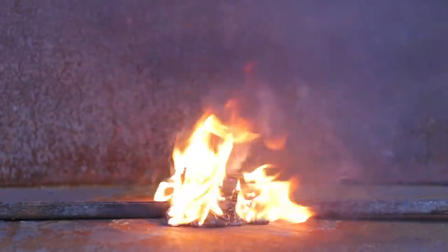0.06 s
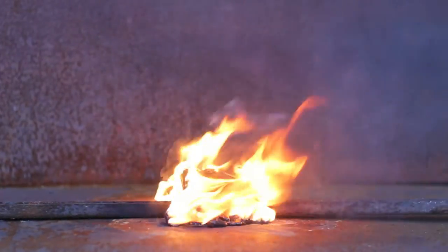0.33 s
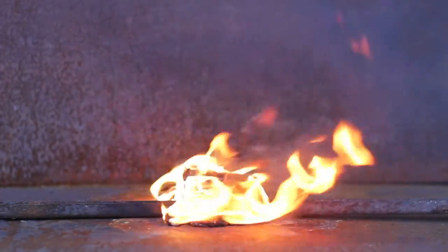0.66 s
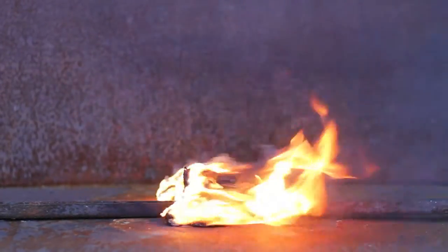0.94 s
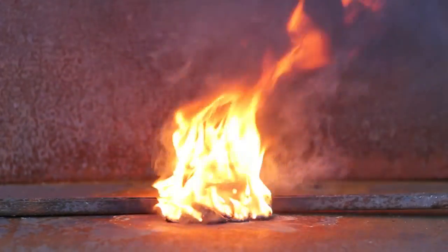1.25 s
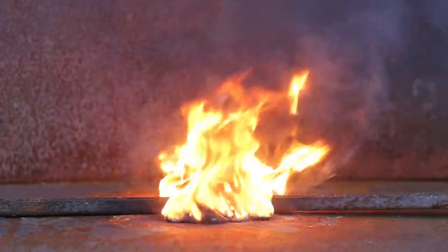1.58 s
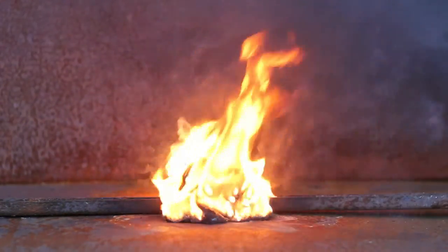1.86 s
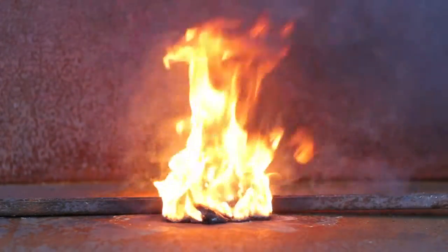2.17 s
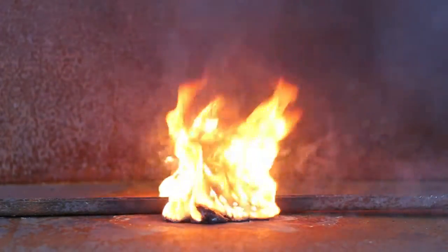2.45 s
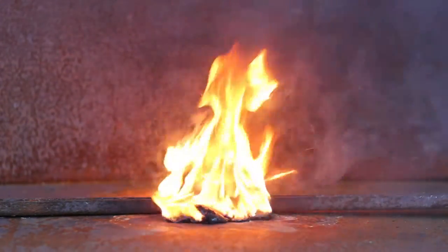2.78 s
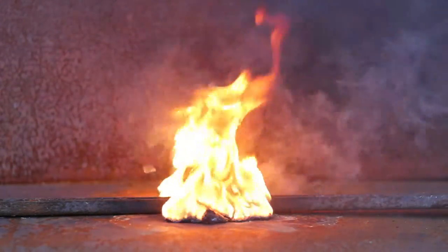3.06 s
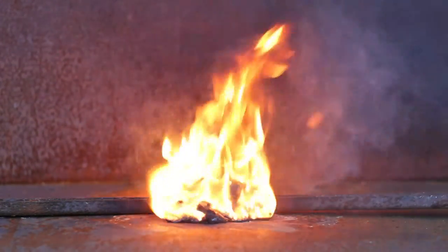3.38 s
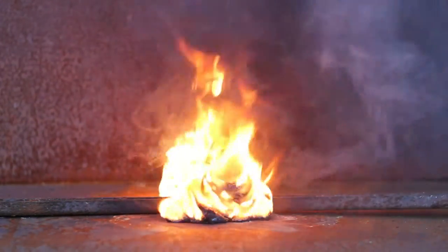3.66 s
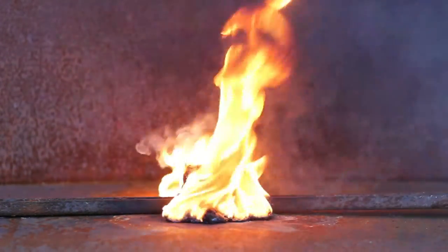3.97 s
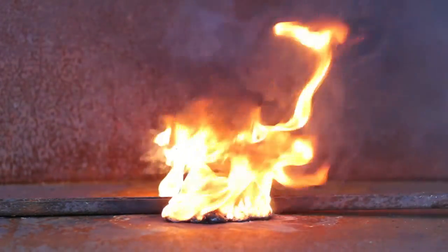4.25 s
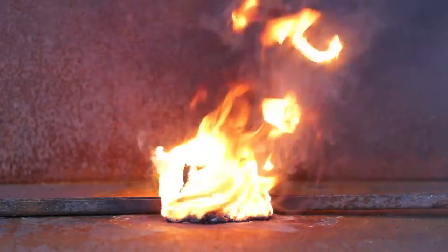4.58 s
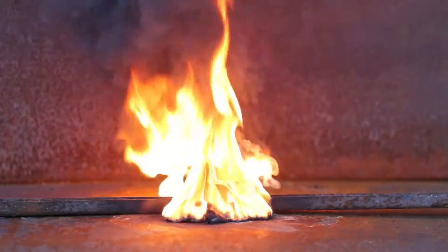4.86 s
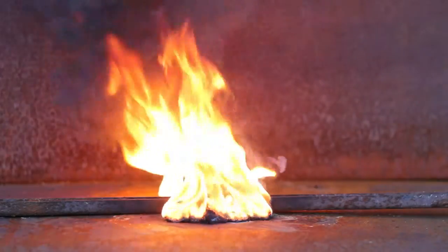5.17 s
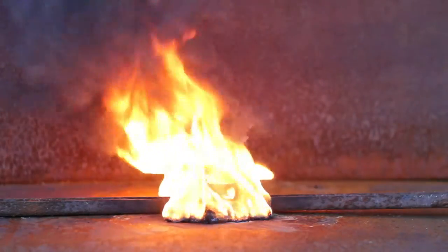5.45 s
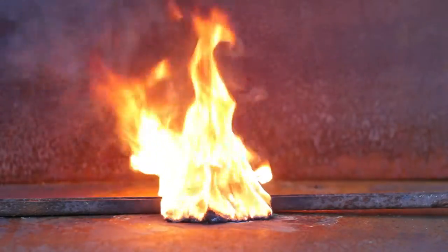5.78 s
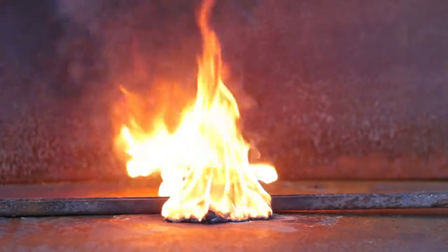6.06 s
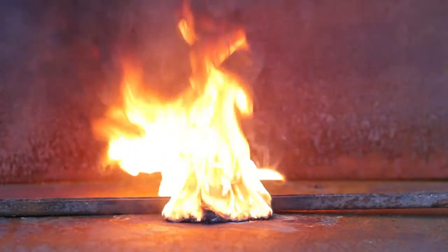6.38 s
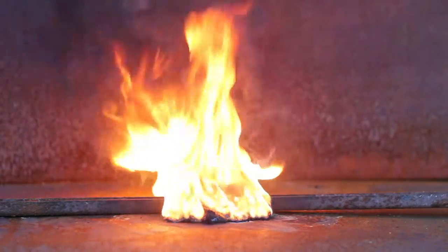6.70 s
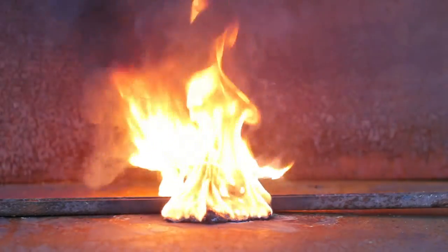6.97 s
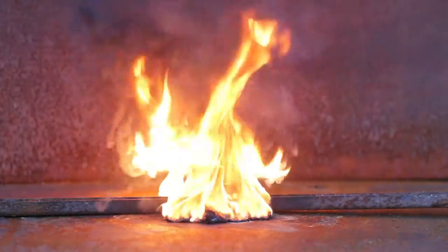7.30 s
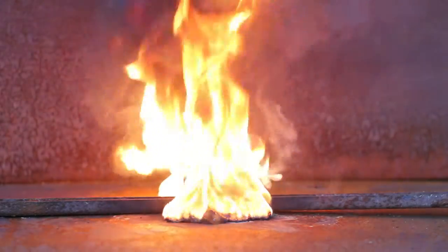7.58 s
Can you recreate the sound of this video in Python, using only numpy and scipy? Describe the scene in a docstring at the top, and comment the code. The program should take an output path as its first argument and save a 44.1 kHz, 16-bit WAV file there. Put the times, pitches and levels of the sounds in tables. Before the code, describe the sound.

Outdoors, flames flutter in a gust, then a lump of burning plastic snaps and crackles over a soft sizzle.

```python
"""Outdoors, in front of a wall, a lump of plastic burns on a steel plate.
Gas blisters burst in the melt as sharp pops and fine crackle over a soft hiss; the pops throw off specks,
and plate and wall reflect each pop. The turbulent flames give a low roar: a gust flattens them at first
and makes them flap, and they flare again at the end. Something hums faintly far away."""
import sys
import numpy as np
from scipy import signal
from scipy.fft import rfft, irfft
from scipy.io import wavfile
from scipy.ndimage import uniform_filter1d

SR = 44100
rng = np.random.default_rng(int(sys.argv[2]) if len(sys.argv) > 2 else 0)


def wav_record(signal):
    """Record a signal, one row per channel, as 16-bit PCM in the file named by sys.argv[1]."""
    frames = np.transpose(np.atleast_2d(signal))
    bounded = np.clip(frames, -1, 1)
    # unit amplitude maps onto the largest positive 16-bit level
    quanta = np.round(bounded * 32767).astype(np.int16)
    wavfile.write(sys.argv[1], SR, quanta)


N = 336483

# Large bursting blisters: (time [s], relative snap level [dB], resonance of the hollow beneath [Hz],
# its level re snap [dB], resonance of the skin [Hz], its level re snap [dB],
# level of the tail after the snap [dB]: echoes and, where high, a brief fizzing spit of gas)
BLISTERS = [(.922, -14.5, 1490, -9, 4500, -7, 5.5), (.942, -22.5, 1210, 8, 2400, 2, 10.5),
            (1.041, -7.5, 2300, 5, 5900, -5, -4), (1.063, -18, 1300, 5, 2800, -5, -1),
            (1.1932, -22, 2880, 1, 7160, 4, -1), (1.4042, -22, 1700, 9, 13300, 5.5, -10),
            (1.604, -29.5, 980, 0, 8950, 9, 7.5), (1.672, -12.5, 1080, 4.5, 2300, -1, 1),
            (1.7588, -26, 1150, -1, 13400, 6, -15), (1.8091, -24, 900, -7, 12200, 9, -11),
            (1.9545, -0.5, 1620, 7.5, 10600, -2.5, -3), (2.0637, -22, 2840, 8, 9000, 11, -18),
            (2.0758, -8, 2050, 7.5, 5330, -3, 0.5), (2.1028, -14.5, 2540, -1, 7300, 2, -8),
            (2.225, -25, 900, -12, 12500, 2, 7.5), (2.252, -31, 900, 5, 13300, 12, -3),
            (2.2759, -24, 1520, -9, 13400, 6, 1), (2.351, -22, 2860, 6, 10400, 4.5, 0),
            (2.5121, -13, 1750, 4.5, 2500, 0, -14), (2.5856, -6, 1790, -11, 6400, 5.5, -2.5),
            (2.5934, -12.5, 2630, 0, 4600, 6, 1.5), (2.6337, -3, 1100, 2, 11100, 13.5, -4),
            (3.3023, -26, 2570, -6, 11300, 4, -6), (3.3955, -21.5, 2920, 0, 7340, 11.5, 2.5),
            (3.6022, -10, 2880, 2.5, 10100, 3.5, -11), (3.6418, -22, 2840, 2, 11700, 8.5, -11),
            (3.6695, -12, 900, -3, 4300, 4.5, -0.5), (3.7041, -22.5, 1370, -5, 13400, 7, 3.5),
            (3.74, -22, 900, -7, 8600, 7, 0), (3.8138, -25.5, 1870, 14, 11000, -4, 13),
            (4.0739, -23.5, 1460, -2, 12500, 1, -1), (4.1083, -16, 1500, -7, 4280, 5.5, 4),
            (4.236, -18, 2350, 4, 5200, -11, -2), (4.4828, -23, 2060, 11, 4400, 4, 2),
            (4.4901, -8, 1120, 12.5, 2980, -12, -4.5), (4.5937, -11.5, 2880, 6.5, 1770, 5, -4),
            (4.7707, -28.5, 2840, -1, 11800, 11, -8), (5.2086, -13, 1900, -4, 3100, -3, -14),
            (5.2427, -2.5, 2200, 1.5, 4700, 2.5, -14), (5.2693, -20, 2830, 2, 12400, 1, -4),
            (5.4416, -15, 2200, 1, 3600, -13, -4), (5.4543, -20.5, 1480, -3, 7800, 6, -12),
            (6.2576, -2, 1700, 3, 9050, -0.5, -4), (6.3207, -19, 2710, -4, 9800, 2, -11),
            (6.451, -26, 2200, -3, 9000, 3, 4), (6.4558, -8, 970, -2, 5700, 4, -8),
            (6.4873, -33, 2230, -6, 11500, 19, -6), (6.8989, -6.5, 1550, -2, 3720, 3.5, -4.5),
            (7.0345, -27, 900, -2, 10000, 9, -8), (7.1993, -23, 1250, -4, 12000, 10.5, -7),
            (7.4888, -24, 1740, -2, 12000, 0, -3)]
SNAP_OVER_SKIN = 1.95  # snap corner over skin pitch: a small blister rings higher and tears faster


def gain_of(db):
    """Amplitude ratio of a level in decibels."""
    return 10 ** (np.asarray(db) / 20)


def evened(x):
    """Normalisation to unit rms."""
    return x / np.sqrt(np.mean(x ** 2) + 1e-20)


def add(mix, s, sound):
    """Superposition: a sound joins the mix at time s."""
    part = mix[max(round(s * SR), 0):][:len(sound)]
    part += sound[:len(part)]


def coloured(x, spectrum):
    """Spectral shaping by points of (frequency [Hz], gain [dB])."""
    hz, db = np.transpose(spectrum)
    curve_db = np.interp(np.log(np.fft.rfftfreq(N, 1 / SR) + 1), np.log(hz), db)
    return irfft(rfft(x) * gain_of(curve_db), N)


def dulled(x, hz):
    """First-order low-pass filtering."""
    pole = np.exp(-2 * np.pi * hz / SR)
    return signal.lfilter([1 - pole], [1, -pole], x)


def fluctuation(corner_hz):
    """Slow random variation: low-passed noise of unit rms."""
    hz = np.fft.rfftfreq(N, 1 / SR)
    return evened(irfft(rfft(rng.standard_normal(N)) / (1 + (hz / corner_hz) ** 2), N))


def turbulence(spectrum, flicker_db, flicker_hz):
    """Random amplitude modulation of coloured noise, at unit rms."""
    flicker = gain_of(flicker_db * fluctuation(flicker_hz))
    return evened(coloured(rng.standard_normal(N), spectrum) * flicker)


def swell(calm_db, gust_db, fade_s, flare_share, gust_hold_s=0.69):
    """Amplitude envelope of a flame layer: the opening gust and each flare raise its calm level."""
    # Flares of the fire: (peak time [s], 1/e half-width [s], rise at a share of 1 [dB])
    flares = [(0.055, 0.033, 4), (4.494, 0.11, 2.5), (7.298, 0.48, 4), (7.303, 0.036, 4.5),
              (7.567, 0.071, 3)]
    t = np.arange(N) / SR
    gust = np.clip(1 - (t - gust_hold_s) / fade_s, 0, 1)
    flare_db = sum(db * np.exp(-((t - s) / half) ** 2) for s, half, db in flares)
    return gain_of(calm_db + gust_db * gust + flare_share * flare_db)


def flames():
    """Turbulent combustion radiates a roar and a rush; wind buffets the flames and tears off licks."""
    # Noise spectra of the four layers: (frequency [Hz], relative spectral density [dB])
    roar_spectrum = [(50, -50), (95, -15), (145, 2.5), (210, -2.5), (300, -8), (400, -15), (550, -18),
                     (1200, -58)]
    rush_spectrum = [(100, -14), (250, -0.5), (350, 0), (550, -1.5), (720, -1.5), (1000, -5), (1500, -9.5),
                     (2200, -15), (3200, -20.5), (6000, -21.5), (16000, -48)]
    licks_spectrum = [(300, -10), (1000, -1.5), (1600, -2), (2500, -4.5), (4000, -15.5), (8000, -35),
                      (16000, -45)]
    buffet_spectrum = [(15, -38), (30, -16), (48, 3), (75, -2), (110, 1.5), (200, -27), (500, -58)]
    roar = turbulence(roar_spectrum, flicker_db=2.2, flicker_hz=42)
    roar *= swell(calm_db=-56, gust_db=3, fade_s=.5, flare_share=1.4)
    rush = turbulence(rush_spectrum, flicker_db=1.7, flicker_hz=26.1)
    rush *= swell(calm_db=-56, gust_db=3.5, fade_s=.27, flare_share=.64)
    licks = turbulence(licks_spectrum, flicker_db=4, flicker_hz=38)
    licks *= swell(calm_db=-70, gust_db=11, fade_s=.72, flare_share=.61)
    buffet = turbulence(buffet_spectrum, flicker_db=1.4, flicker_hz=1.6)
    buffet *= swell(calm_db=-61.5, gust_db=6.5, fade_s=.49, flare_share=.14)
    return roar + rush + licks + buffet


def hiss():
    """The sizzling melt radiates broadband noise at a nearly steady level."""
    # Envelope of the sizzle: (time [s], level [dB])
    envelope = [(0, -57), (.55, -58), (.8, -60), (1.3, -58), (2.2, -55.5), (2.8, -57), (7.63, -56.5)]
    # Spectrum of the sizzle: (frequency [Hz], relative spectral density [dB])
    spectrum = [(300, -4), (1500, -5.5), (3000, -1), (5000, 0), (8000, 1), (11000, 2.5), (14500, 3),
                (15700, 2), (16200, -59), (17000, -50)]
    s, db = np.transpose(envelope)
    gain = gain_of(np.interp(np.arange(N) / SR, s, db))
    return gain * turbulence(spectrum, flicker_db=1.35, flicker_hz=60)


def hum(waver_hz=6):
    """Faint distant tones waver in pitch by random frequency modulation."""
    # Partials of the hum: (frequency [Hz], level [dB], rms frequency deviation [Hz])
    partials = [(100, -66, 1), (400, -68, 1.8), (1400, -73, 1)]
    out = np.zeros(N)
    for hz, db, deviation in partials:
        pitch_hz = hz + deviation * fluctuation(waver_hz)
        out += gain_of(db) * evened(np.sin(2 * np.pi * np.cumsum(pitch_hz) / SR))
    return out


def flaps(level_db=-1, cycles=0.45, every_s=.016):
    """Each flap of the flame sheet radiates a compression between two rarefactions; long bouts flutter."""
    # Bouts of flapping: (start time [s], duration [s], relative peak level [dB], frequency [Hz])
    bouts = [(.028, .01, -35, 80), (.171, .025, -32.5, 126), (.36, .01, -29.5, 126), (.45, .01, -28, 67),
             (.497, .01, -29.5, 73), (.529, .01, -35, 75), (.56, .055, -27, 114), (4.54, .01, -37, 120),
             (7.321, .01, -32, 180), (7.565, .01, -40, 150)]
    out, t = np.zeros(N), np.arange(-SR // 20, SR // 20) / SR
    for start, length, db, hz in bouts:
        push = gain_of(db + level_db) * np.cos(2 * np.pi * hz * t) * np.exp(-(hz * t / cycles) ** 2)
        for s in start + np.arange(0, length, every_s):
            add(out, s + t[0], push[s + t >= 0])
    return out


def burst(corner_hz, resonances, lowest_hz=600, size=512):
    """Impulse excitation: a snap, rounder if slower, rings modes (frequency [Hz], level [dB], Q)."""
    f = np.fft.rfftfreq(size, 1 / SR)
    power = 1 / (1 + (f / corner_hz) ** 2) ** 2
    for hz, db, q in resonances:
        s = 1j * f / hz
        band = abs(s / q / (1 + s / q + s ** 2))
        power += (gain_of(db) * band ** 2) ** 2
    power /= 1 + (lowest_hz / (f + 1)) ** 12  # so small a source radiates no bass
    log_gain = np.log(power + 1e-8) / 2
    # minimum phase puts the sharp edge first
    log_spectrum = signal.hilbert(np.r_[log_gain, log_gain[-2:0:-1]]).conj()
    return np.fft.ifft(np.exp(log_spectrum)).real


def scatter(t60, size=6144):
    """Diffuse reflection: an exponentially decaying response of unit energy that favours no pitch."""
    t = np.arange(size) / SR
    arrived = t > .0005
    spectrum = rfft(rng.standard_normal(size) * gain_of(-60 * t / t60) * arrived)
    power = uniform_filter1d(abs(spectrum) ** 2, size=120)
    whitened = irfft(spectrum / np.sqrt(power), size)
    return evened(whitened * arrived) / np.sqrt(size)


def surroundings(tail_db, bounce_db=-5, near_db=-1, far_db=-8):
    """Multipath propagation: direct sound, then a tail of a bounce off the steel, scatter and echoes."""
    # Reflections from plate and surroundings: (delay [s], relative level [dB])
    echoes = [(.0036, -4.5), (0.0299, -16), (0.046, -21)]
    near = gain_of(near_db) * scatter(t60=.034)
    far = gain_of(far_db) * scatter(t60=.23)
    for delay, db in echoes:
        smear = evened(rng.standard_normal(64) * np.hanning(64)) / np.sqrt(64)
        add(far, delay, gain_of(db) * smear)
    tail = dulled(near, hz=10000) + dulled(far, hz=3500)
    add(tail, rng.uniform(.0011, .0015), gain_of([bounce_db]))
    return np.r_[1, gain_of(tail_db) * tail[1:]]


def crackle(level_db=-39, spread_db=3, skin_db=6, skin_q=3.4, follow_s=.05, count=130):
    """A random impulse train of tiny blisters: about half burst freely, the rest are set off by a pop."""
    out = np.zeros(N)
    for free, when, wait, size, pitch in rng.random((count, 5)):
        if free < .5:
            s = when * N / SR
        else:
            pop_s = BLISTERS[int(when * len(BLISTERS))][0]
            s = pop_s - follow_s * np.log(1 - wait)  # exponentially distributed delay
        skin_hz = 5000 + 9000 * pitch
        tick = burst(SNAP_OVER_SKIN * skin_hz, [(skin_hz, skin_db, skin_q)])
        db = level_db + spread_db * min(-np.log(1 - size), 3)
        add(out, s, gain_of(db) * signal.fftconvolve(tick, surroundings(tail_db=-2)))
    return out


def pops(level_db=-0.05, hollow_q=2.16, skin_q=3.15, soft_hz=8000):
    """Damped resonance of each large blister's hollow and skin; hot plastic damps the high rings most."""
    out = np.zeros(N)
    for s, db, hollow_hz, hollow_db, skin_hz, skin_db, tail_db in BLISTERS:
        damped_q = skin_q / (1 + (skin_hz / soft_hz) ** 2)
        modes = [(hollow_hz, hollow_db, hollow_q), (skin_hz, skin_db, damped_q)]
        pop = burst(SNAP_OVER_SKIN * skin_hz, modes)
        response = surroundings(tail_db)  # a strong tail is a brief fizzing spit of gas
        add(out, s, gain_of(db + level_db) * signal.fftconvolve(pop, response))
    return out


def spatter(below_db=-22, fade_db_per_s=90, first_s=.011, last_s=.055, low_hz=1800, high_hz=4500):
    """Impact sound: each pop throws off specks of melt, which land as duller, weaker ticks."""
    out = np.zeros(N)
    count, ring_db, ring_q = 4, 3, 2
    for (s, db, *_), specks in zip(BLISTERS, rng.random((len(BLISTERS), count, 2))):
        for flight, pitch in specks:
            flight_s = first_s + (last_s - first_s) * flight
            hz = low_hz + (high_hz - low_hz) * pitch
            impact = burst(SNAP_OVER_SKIN * hz, [(hz, ring_db, ring_q)])
            tick = signal.fftconvolve(impact, scatter(t60=.025))
            add(out, s + flight_s, gain_of(db + below_db - fade_db_per_s * flight_s) * tick)
    return out


def scene():
    """Superposition of all sources at one listening point."""
    # Frequency response of the lump on the plate, common to all blisters: (frequency [Hz], gain [dB])
    lump_response = [(450, 3), (700, -1), (1000, 0.5), (1300, -1.5), (1750, -1.5), (2400, -0.5), (3100, -2),
                     (4100, 1), (5500, 0), (8000, -1.5), (11000, 0), (15000, -1.5)]
    blisters = coloured(pops() + crackle() + spatter(), lump_response)
    return (flames() + hiss() + hum() + flaps() + blisters)[None]


def record(dry):
    """Band limiting: a steep low-pass removes the highest treble."""
    edge_hz = 16700
    low_pass = signal.firwin(255, edge_hz, window=("kaiser", 8), fs=SR)
    return signal.oaconvolve(dry, low_pass[None], "same")


dry = scene()
out = record(dry)
wav_record(out)
```